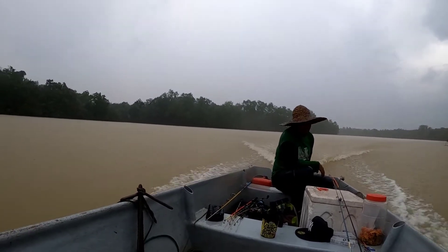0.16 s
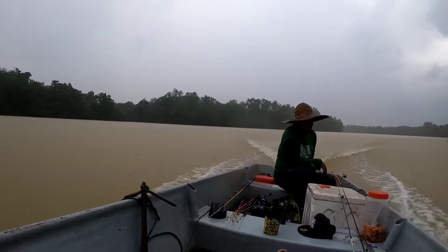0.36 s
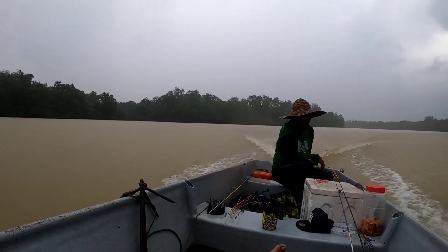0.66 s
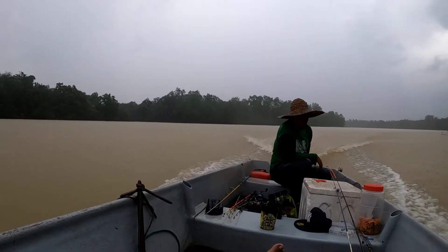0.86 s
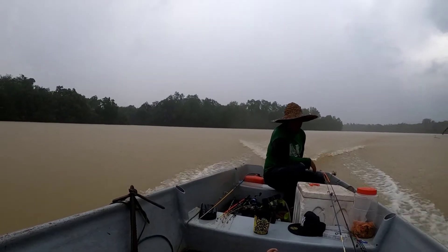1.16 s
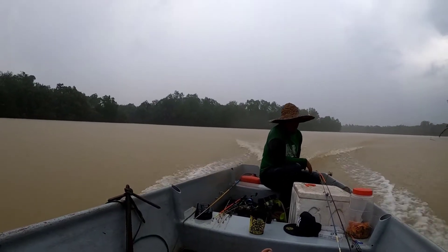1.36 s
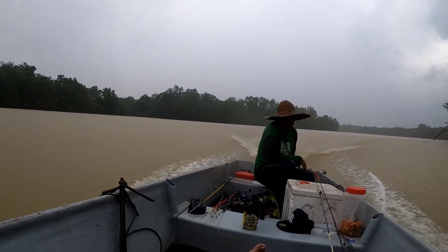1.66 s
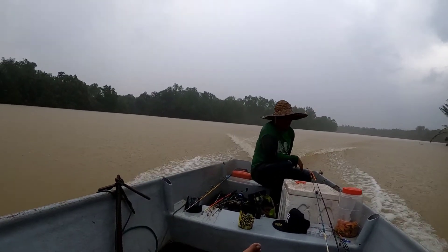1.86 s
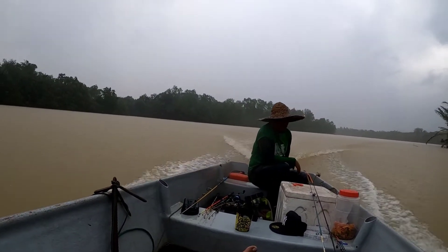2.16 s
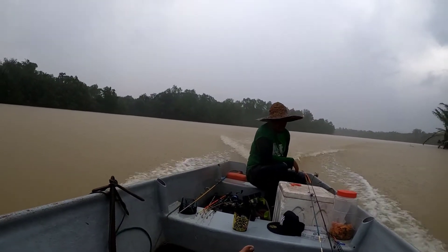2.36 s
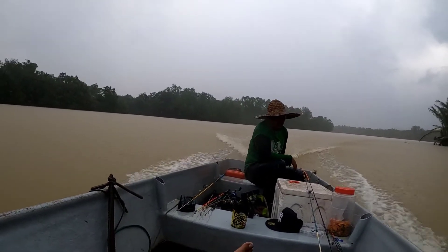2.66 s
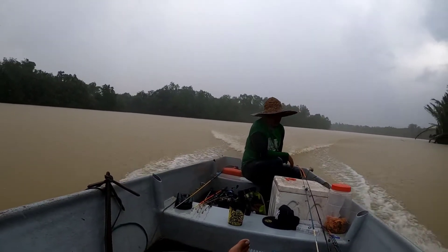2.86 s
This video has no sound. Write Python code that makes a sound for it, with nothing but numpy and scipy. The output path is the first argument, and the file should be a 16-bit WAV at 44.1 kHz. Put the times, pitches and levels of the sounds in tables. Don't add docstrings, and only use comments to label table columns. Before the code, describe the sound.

Steady low outboard engine drone on an open boat, with hull wash, wind buffeting and splashes

```python
import sys
import numpy as np
from scipy import signal
from scipy.io import wavfile

SR = 44100
rng = np.random.default_rng(int(sys.argv[2]) if len(sys.argv) > 2 else 0)


def level_to_linear(level):
    exponent = np.asarray(level, float) / 20
    return 10 ** exponent


def wav_record(signal):
    frames = np.transpose(np.atleast_2d(signal))
    bounded = np.clip(frames, -1, 1)
    quanta = np.round(bounded * 32767).astype(np.int16)
    wavfile.write(sys.argv[1], SR, quanta)


N = 132300

# frequency in Hz, level in dB per Hz.
WIND_SPECTRUM = [(20, -2), (35, 0), (60, 0), (110, 0), (220, -3.5), (450, -14)]
WIND_DB, GUST_FOLLOWS = -23, .3

# frequency in Hz, level in dB per Hz.
PORT_SPECTRUM = [(20, -8), (48, -3), (204, -3.5), (420, -13), (1300, -27.5), (6320, -38), (11000, -54),
                 (12500, -76)]
APART_DB, APART_TOP_HZ = -17, 10500
BLEND_DB_PER_S, BLEND_END_S, BLEND_SHUT_DB_PER_S = 32, 0.99, 57.5

# time in seconds, wash level in dB, wind level in dB.
SWELL = [(0.0, -33.5, -36), (0.02, -28, -38.5), (0.07, -30, -19), (0.12, -25.5, -35.5), (0.17, -29.5, -17),
         (0.32, -29.5, -31), (0.48, -30.5, -19), (0.53, -30.5, -36.5), (0.73, -31, -24),
         (1.59, -32.5, -39.5), (1.62, -32.5, -23), (1.83, -31, -39), (1.87, -31.5, -45),
         (2.03, -30.5, -42.5), (2.21, -30, -31), (2.28, -31, -40), (2.45, -30.5, -31), (3.0, -31, -31.5)]

# frequency in Hz, level in dB per Hz.
RUSH_SPECTRUM = [(300, 1), (550, -5.5), (950, -9.5), (1400, -15.5), (2800, -20.5), (5000, -31),
                 (8000, -42.5), (14500, -57.5)]
RUSH_DB, CHUFF_DB = 4, 0.8
BRIGHT_HZ, RUSH_LOSS_DB = 3500, 4
HULL_HZ, HULL_DB = 974, -8
SETTLE_S, ENGINE_GAIN_DB = .3, 2.5

DROPS_PER_S, DROPS_DB, DROP_CYCLES = 960, -41.5, 2
DROPS_FOLLOW = 1.5

# start in seconds, peak level in dB, pitch in Hz.
PINGS = [
    (0.6304, -34, 3340),
    (1.0131, -14.5, 3720),
    (1.9011, -27.5, 4760),
    (2.2927, -24.5, 3920),
    (2.5157, -28, 3800),
    (2.6249, -27.5, 4610),
    (1.071, -36, 7630),
    (2.3446, -37, 6900),
    (2.7302, -35, 7035),
]

# start in seconds, peak level in dB, pitch in Hz.
SLAPS = [
    (0.0804, -28, 2700),
    (0.1438, -25.5, 2450),
    (0.7294, -23.5, 2590),
    (0.7838, -29.5, 2850),
    (0.9062, -28, 3090),
    (1.5465, -40, 2180),
    (1.5718, -22, 2230),
    (1.6967, -28, 2680),
    (1.7194, -27.5, 2357),
    (2.9074, -32.5, 2900),
]

# start in seconds, peak level in dB, pitch in Hz.
SPITS = [(0.0803, -30.5, 6180), (0.379, -33.5, 6560), (0.414, -35.5, 6180), (0.7692, -30.5, 5970),
         (1.0136, -35.5, 7100), (1.342, -34.5, 6560), (1.838, -34, 6200), (1.9018, -37.5, 7000),
         (2.0124, -40, 6740), (2.1724, -32, 6343), (2.275, -43, 6200), (2.433, -36, 6200)]

# multiple of shaft speed, level in dB.
MESH = [(38, -2), (40, 0), (41, -4)]
# time in seconds, whine level in dB.
MESH_LOAD = [
    (0, -58),
    (.4, -60),
    (.9, -59),
    (1.3, -62),
    (1.84, -59),
    (1.9, -51),
    (2.08, -52),
    (2.18, -60),
    (3, -56),
]
MESH_DB = 0.5

# time in seconds, speed in Hz.
SHAFT = [
    (0.0, 73.8),
    (0.04, 70.88),
    (0.33, 71.5),
    (0.38, 72.13),
    (0.57, 71.13),
    (1.7, 71.05),
    (1.94, 70.9),
    (2.12, 71.27),
    (2.69, 70.9),
    (3.0, 71.6),
]
# multiple of shaft speed, level in dB.
WHOLE_ORDERS = [(1, -14), (2, -0.5), (3, -21.5), (4, -15), (5, -23.5), (6, -12), (8, -25.5), (9, -39),
                (11, -45.5), (12, -41), (13, -35.5), (16, -39.5)]
# multiple of shaft speed, level in dB.
LOOSE_ORDERS = [(.5, -33), (1.5, -26.5), (2.5, -28), (3.5, -32.5), (4.5, -25), (5.5, -40.5), (6.5, -31.5),
                (7, -36.5)]
ENGINE_DB, SMEAR_RAD, START_RAD = -7.5, .374, 2.06
STEADY_DB, WOBBLE_DB, SLIP_RAD = 0.15, 1.76, 0.03
LOOSE_DB, LOOSE_RAD = 7, 1.9


def rms_one(x):
    return x / np.sqrt(np.mean(x ** 2) + 1e-20)


def drift(rate):
    r = np.exp(-80 * np.pi * rate / SR)
    slow = signal.lfilter([1], [1, -2 * r, r * r], rng.standard_normal(N // 40 + 2002))[2000:]
    return np.interp(np.arange(N) / 40, np.arange(len(slow)), rms_one(slow - slow.mean()))


def band(x, low_hz, high_hz):
    return signal.sosfilt(signal.butter(2, [low_hz, min(high_hz, .45 * SR)], "band", fs=SR, output="sos"), x)


def banded_noise(spectrum, patchy_db, fast, shared):
    hz, db = np.transpose(spectrum)
    edges = hz[0] * 2 ** np.arange(0, np.log2(hz[-1] / hz[0]) + .2, 1 / 3)
    together = drift(fast / 3)
    white = rng.standard_normal((2, N + 9000))
    out = 0
    for k, (low, high) in enumerate(zip(edges, edges[1:])):
        level_db = np.interp(np.log(low * high) / 2, np.log(hz), db)
        flicker_db = patchy_db * (shared * together + drift(fast))
        out = out + level_to_linear(level_db + flicker_db) * band(white[k % 2], low, high)[9000:]
    return rms_one(out)


def recorder_hiss():
    low_hz, high_hz = 11600, 14300
    white = rng.standard_normal((2, N))
    return level_to_linear(-66.5) * rms_one(band(band(white, low_hz, high_hz), low_hz, high_hz))


def port_difference(t):
    width_db = APART_DB - BLEND_DB_PER_S * t - BLEND_SHUT_DB_PER_S * np.maximum(t - BLEND_END_S, 0)
    side = level_to_linear(width_db) * banded_noise(PORT_SPECTRUM, patchy_db=1.2, fast=12.0, shared=.9)
    return signal.sosfilt(signal.butter(6, APART_TOP_HZ, fs=SR, output="sos"), side)


def wind(gust_db):
    level_db = WIND_DB + GUST_FOLLOWS * (gust_db - gust_db.mean())
    return level_to_linear(level_db) * banded_noise(WIND_SPECTRUM, patchy_db=1.6, fast=10.0, shared=.6)


def hull_rush(wash_db, turn, fresh):
    noise = banded_noise(RUSH_SPECTRUM, patchy_db=1.42, fast=13.0, shared=0.41)
    rush = level_to_linear(RUSH_DB + wash_db + CHUFF_DB * np.cos(turn)) * noise
    rush = rush + (level_to_linear(RUSH_LOSS_DB * fresh) - 1) * band(rush, BRIGHT_HZ, 14000)
    return rush + level_to_linear(HULL_DB + 2.3 * drift(18.0)) * band(rush, HULL_HZ / 1.08, HULL_HZ * 1.09)


def droplets(wash_db):
    sizes = level_to_linear(1.5 * np.minimum(rng.exponential(1, N), 5)) * rng.choice([-1, 1], N)
    born = rng.random(N) < DROPS_PER_S * level_to_linear(4.0 * drift(12.0)) / SR
    pitch = rng.integers(0, 14, N)
    out = 0
    for k, hz in enumerate(np.geomspace(650, 9500, num=14)):
        r, w = level_to_linear(-60 * hz / (DROP_CYCLES * SR)), 2 * np.pi * hz / SR
        strikes = sizes * born * (pitch == k) + 1e-18
        ringing = signal.lfilter([0, np.sin(w)], [1, -2 * r * np.cos(w), r * r], strikes)
        out = out + ringing * (1300 / hz) ** 2.1
    return level_to_linear(DROPS_FOLLOW * (wash_db - wash_db.mean()) + DROPS_DB) * rms_one(out)


def splashes(table, width, t60, gain_db):
    out, t = np.zeros(N + 2000), np.arange(2000) / SR
    for (s, db, hz), noise in zip(table, rng.standard_normal((len(table), 2000))):
        edges = hz / (1 + 1.6 * width), hz * (1 + .7 * width)
        struck = noise * level_to_linear(-60 * t / t60) * np.minimum(t / .0012, 1)
        burst = band(band(struck, *edges), *edges)
        start = int(s * SR)
        out[start:start + 2000] += level_to_linear(db + gain_db) * burst / np.abs(burst).max()
    return out[:N]


def spray():
    pings = splashes(PINGS, width=0.14, t60=.024, gain_db=-2.0)
    slaps = splashes(SLAPS, width=0.67, t60=0.043, gain_db=-0.5)
    spits = splashes(SPITS, width=.6, t60=0.045, gain_db=-1.5)
    return pings + slaps + spits


def shaft_turn():
    s, hz = np.transpose(SHAFT)
    speed_hz = np.interp(np.arange(N) / SR, s, hz) * (1 + .0012 * drift(6.0))
    return 2 * np.pi * np.cumsum(speed_hz) / SR


def gear(turn):
    s, db = np.transpose(MESH_LOAD)
    load_db = np.interp(np.arange(N) / SR, s, db)
    lines = 0
    for k, share_db in MESH:
        lines = lines + level_to_linear(share_db + 3.8 * drift(8.7)) * np.cos(k * turn + 0.78 * drift(4.0))
    return level_to_linear(MESH_DB + load_db) * np.sqrt(2) * lines


def engine(turn):
    out = 0
    for k, db in WHOLE_ORDERS:
        shake_db = STEADY_DB + WOBBLE_DB * min(-db / 20, 1.5)
        phase = SMEAR_RAD * k * k + START_RAD + SLIP_RAD * k * drift(11.0)
        out = out + level_to_linear(db + shake_db * drift(9.0)) * np.cos(k * turn + phase)
    for k, db in LOOSE_ORDERS:
        swell_db = LOOSE_DB * np.tanh(drift(7.0))
        half_order = round(2 * k) / 2
        out = out + level_to_linear(db + swell_db) * np.cos(half_order * turn + LOOSE_RAD * drift(3.0))
    return level_to_linear(ENGINE_DB) * np.sqrt(2) * out


def scene():
    t, turn = np.arange(N) / SR, shaft_turn()
    fresh = np.exp(-t / SETTLE_S)
    s, wash, gust = np.transpose(SWELL)
    wash_db, gust_db = np.interp(t, s, wash), np.interp(t, s, gust)
    mid = wind(gust_db) + hull_rush(wash_db, turn, fresh) + droplets(wash_db) + spray()
    mid = mid + gear(turn) + level_to_linear(-ENGINE_GAIN_DB * fresh) * engine(turn)
    return mid + port_difference(t) * [[1], [-1]] + recorder_hiss()


def band_limit(x):
    return signal.sosfilt(signal.butter(12, 15200, fs=SR, output="sos"), x)


def record(dry):
    rounded = dry / (1 + np.abs(dry / 1.1) ** 8) ** (1 / 8)
    n = np.arange(N)
    fade = np.minimum(np.minimum(n[::-1], 40 * n + 60) / (.004 * SR), 1)
    return band_limit(fade * rounded)


dry = scene()
out = record(dry)
wav_record(out)
```